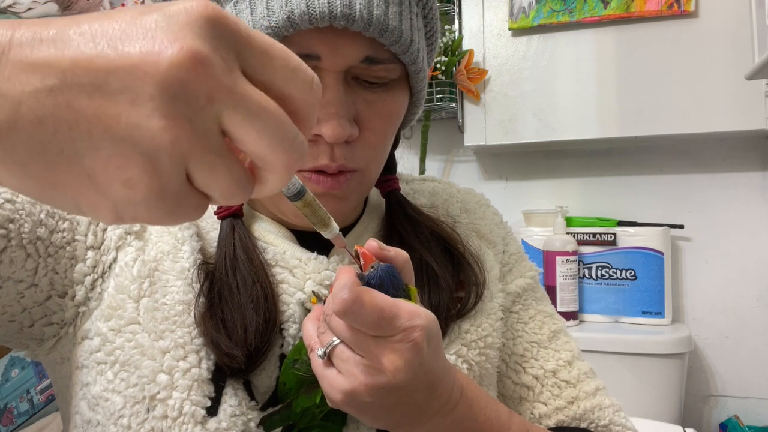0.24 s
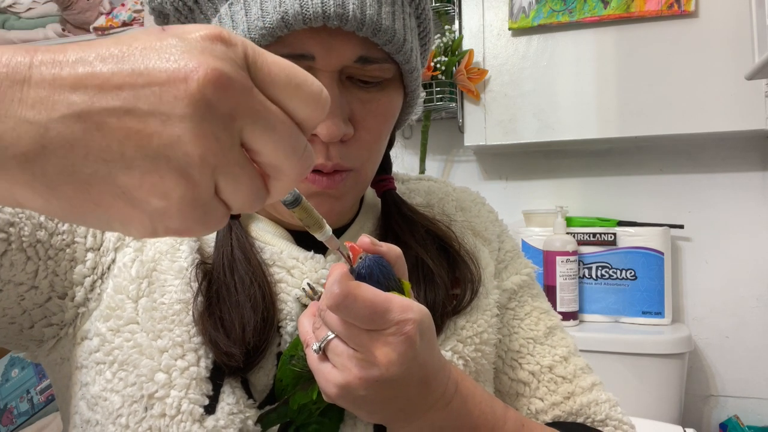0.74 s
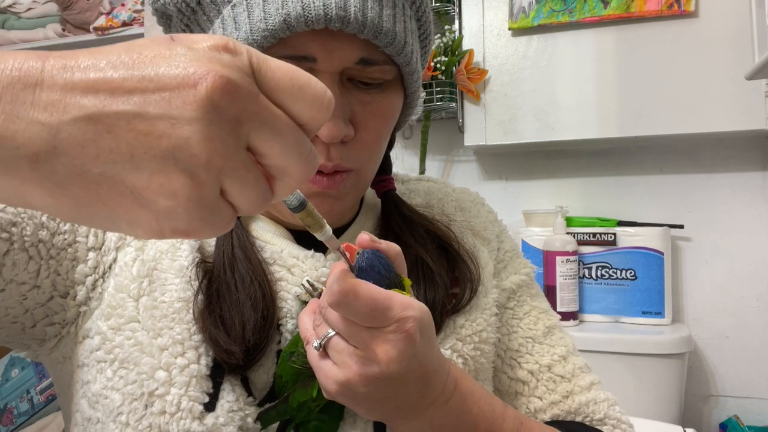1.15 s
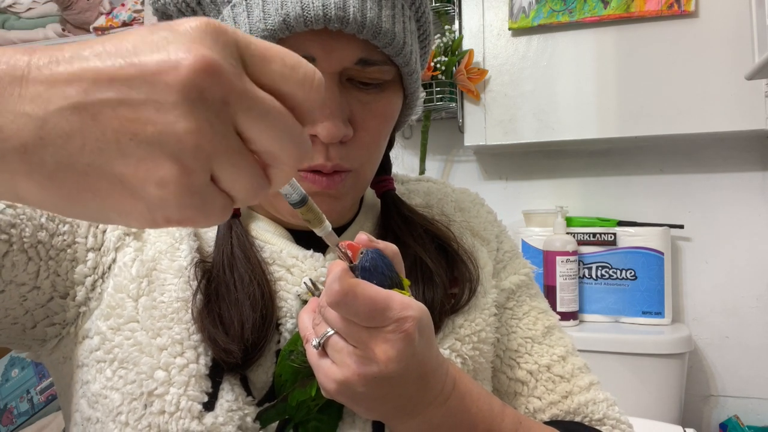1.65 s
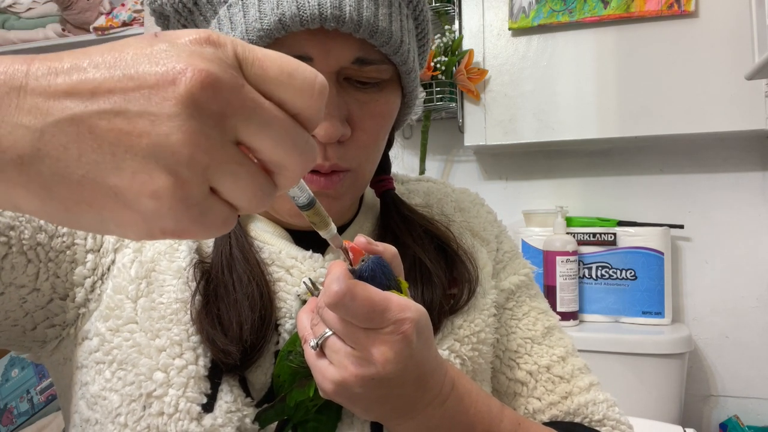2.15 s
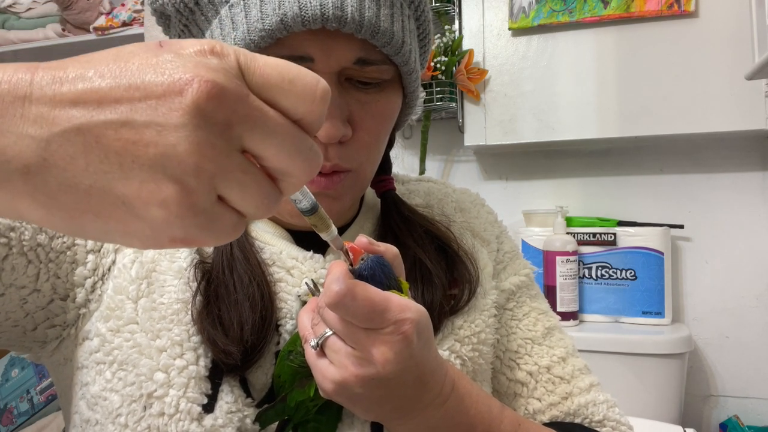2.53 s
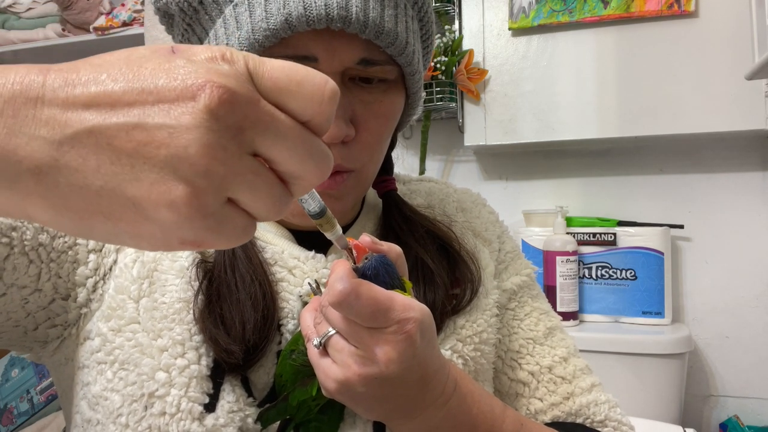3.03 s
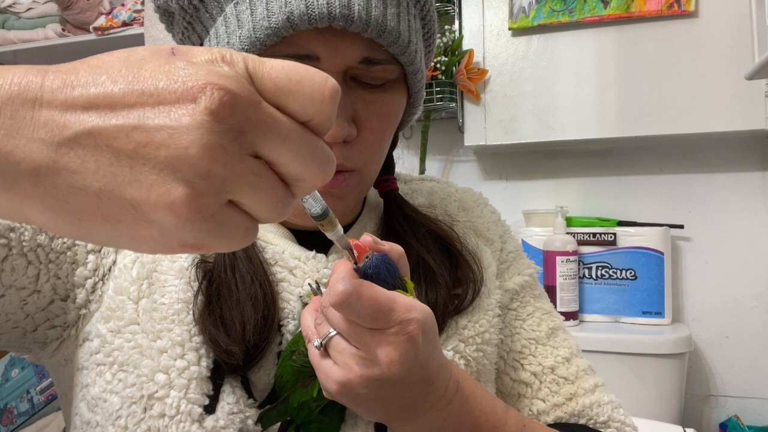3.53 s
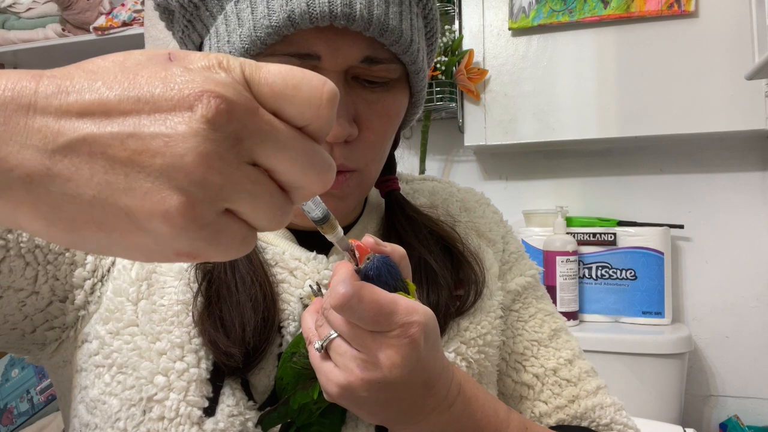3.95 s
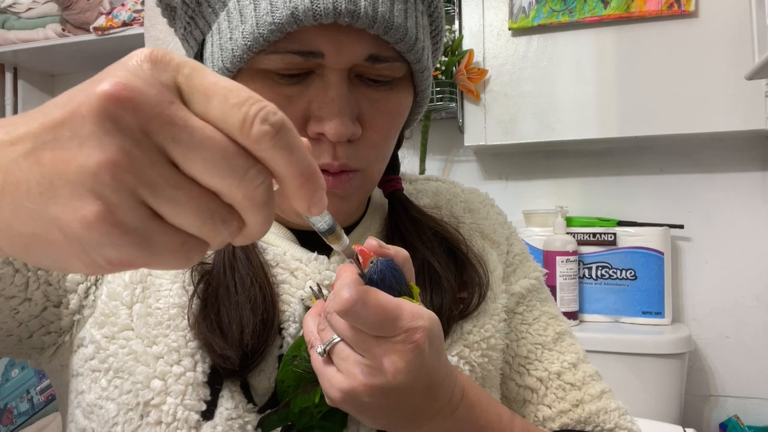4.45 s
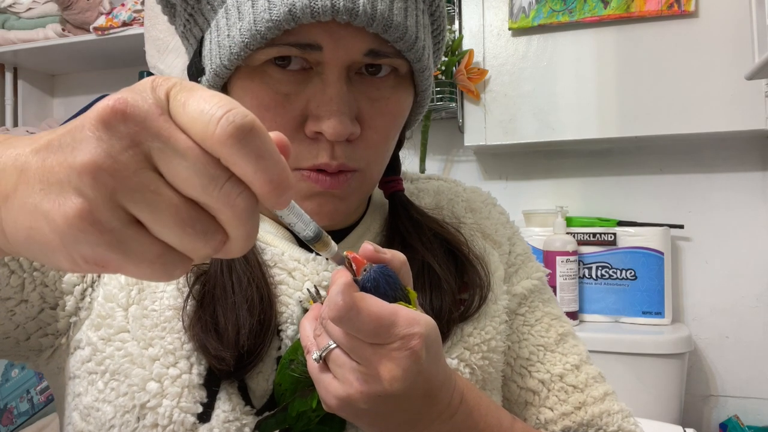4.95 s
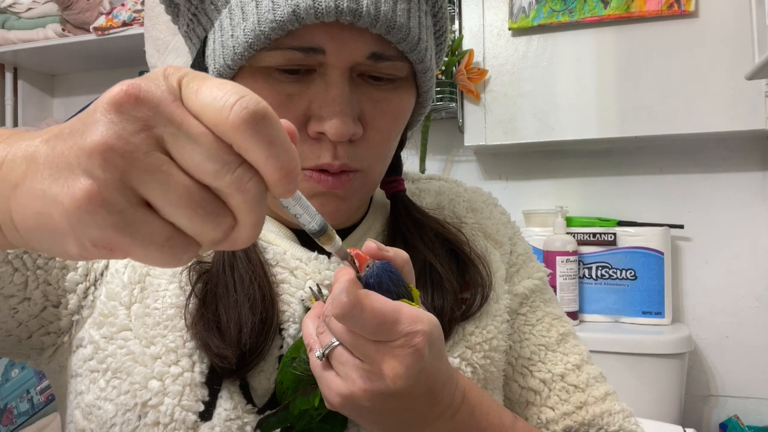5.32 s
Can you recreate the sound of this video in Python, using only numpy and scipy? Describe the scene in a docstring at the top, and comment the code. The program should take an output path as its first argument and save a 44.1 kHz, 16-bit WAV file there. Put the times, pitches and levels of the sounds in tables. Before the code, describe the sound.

A small parrot screeches harshly and repeatedly, about twice a second, very close by in a small room with hard walls.

```python
"""A hand-held lorikeet is already screeching as the sound begins, close by in a small bathroom.
Membranes in its voice box slap together about 950 times a second; a fast flutter chops these pulses,
and throat, mouth and beak colour them. Squeaks edge each screech, and the hard walls ring briefly.
Between the twelve screeches come four thin, falling wheezes and, later on, a few beak clicks.
Behind it all lies a faint room noise, with a low rumble that swells near 1.8 s and again near 4.4 s."""
import sys
import numpy as np
from scipy import signal
from scipy.fft import rfft, irfft, next_fast_len
from scipy.io import wavfile
from scipy.ndimage import uniform_filter1d, map_coordinates

SR = 44100
rng = np.random.default_rng(int(sys.argv[2]) if len(sys.argv) > 2 else 0)


def unload_wav(signal):
    """Save mono or channel-first audio to the path in sys.argv[1] as 16-bit WAV at rate SR, clipped to [-1, 1]."""
    wavfile.write(
        sys.argv[1],
        SR,
        np.round(np.clip(np.atleast_2d(signal).T, -1, 1) * 32767).astype(np.int16),
    )


N = 246078

# One row per screech; levels are relative. Columns: start_s, end_s, level_db, attack_s, sag_db_per_s,
# pitch_hz, jitter (uneven pulse timing, 0-1), windpipe_db, mouth_db, beak_db, closing_squeak_db
SCREECHES = [ (-.06, 0.257, -19.5, .005, 0.5, 916, 0.11, -4, -5.5, 0.5, -30.5),
             (0.443, 0.766, -27, .007, -6, 850.2, .17, -13, -25, -3.5, -38),
             (0.966, 1.276, -26, .015, 16, 966.6, .095, -8, -19.5, -4, -37.5),
             (1.448, 1.794, -21.5, 0.02, 3, 1010, .045, -3, -4.5, -5.5, -35.5),
             (1.992, 2.23, -21, 0.022, 9.5, 944, .08, -6.5, -5, 0.5, -34.5),
             (2.493, 2.691, -21, .019, 6, 918, .08, -6.5, -4.5, 0, -36.5),
             (2.876, 3.175, -23, 0.013, -7.5, 913.5, .08, -8, -2.5, 3, -35),
             (3.377, 3.65, -23.5, 0.02, -10, 915, .07, -10.5, -6, 1.5, -30),
             (3.845, 4.118, -22, 0.013, 12, 894.4, .095, -10, -7, 1.5, -35),
             (4.376, 4.525, -26, 0.022, -2, 925, .08, -10, -7, -1, -39.5),
             (4.679, 5.017, -21, 0.013, 5, 954.7, .08, -5.5, 4, 2.5, -31),
             (5.213, 5.51, -22, .011, 5, 949, 0.07, -6.5, 2.5, 2, -34), ]


def screeches():
    """The bird's loud calls, each placed at its own time."""
    out = np.zeros(N)
    for row in SCREECHES:
        start, end = row[:2]
        i = np.arange(max(0, int(start * SR)), min(N, int(end * SR)))
        out[i] += screech(i / SR, row)
    return out


def screech(t, row, tone_db=-21, tone_waver=.38):
    """One call: the pitch rises and falls while fluttering pulses ring windpipe, mouth and beak."""
    start, end, level_db, attack_s, sag_db_per_s, pitch_hz, jitter, pipe_db, mouth_db, beak_db, _ = row
    pressure_db, edge_db = effort(t, start, end, attack_s, sag_db_per_s)
    ends = np.linspace(-1, 1, len(t)) ** 4  # 1 at both ends, 0 in the middle
    pitch = pitch_hz * (1.008 - .08 * ends + .012 * wobble(35, len(t)))
    clarity = np.clip(0.062 / jitter, .3, 1.6)  # a ragged screech loses its tone and hisses more
    pulses = voice_box(pitch, jitter, air=0.58 / clarity) * flutter(t - start)
    rasp = throat_and_beak(pulses, mouth_db, beak_db)
    pipe = windpipe(pulses, pitch_hz)
    # the harder the bird presses, the more of the sound comes from the windpipe
    ring_db = pipe_db + 0.74 * pressure_db + .3 * edge_db
    pipe_share = np.clip(amp(ring_db) ** 2 - .04, 0, .8)
    # the smooth swing of the membranes adds a plain tone that the flutter does not chop
    swing_hz = pitch * (1 + tone_waver * jitter / clarity * wobble(500, len(t)))
    swing = np.sin(phase_of(swing_hz)) * amp(1.5 * wobble(150, len(t)))
    tone = amp(tone_db) * clarity * (1 - ends) * unit(swing)
    voice = np.sqrt(1 - pipe_share) * rasp + np.sqrt(pipe_share) * pipe + tone
    fade = np.clip((t[-1] - t) / .016, 0, 1)
    return fade * amp(level_db + pressure_db + edge_db) * voice


def effort(t, start, end, attack_s, sag_db_per_s, surge_width_s=0.059, release_s=0.017):
    """A screech's strength in dB, in two parts: the air pressure, and the fade in and out."""
    # The bird presses harder for a moment, or falters if negative. Columns: time_s, change_db
    surges = [(.078, -7), (1.055, 3), (2.934, 3.5), (3.53, 2), (4.479, 6.5), (4.89, 0.5), (5.295, 2)]
    surge_db = sum(db * np.exp(-((t - s) / surge_width_s) ** 2) for s, db in surges)
    pressure_db = surge_db - sag_db_per_s * (t - (start + end) / 2)
    attack_db = -29.5 * np.exp(-np.abs((t - start) / attack_s) ** 1.48)
    release_db = -19.5 * np.exp((t - end) / release_s)
    return pressure_db, attack_db + release_db


def voice_box(pitch, jitter, air, air_hz=3000):
    """Membranes slap together at uneven intervals; each slap gives a sharp pulse and a puff of hiss."""
    n = len(pitch)
    cycles = np.cumsum(pitch) / SR
    slaps = np.cumsum(np.abs(1 + jitter * rng.standard_normal(512)))  # counted in cycles
    sizes = amp(1.2 * rng.standard_normal(len(slaps)))
    heard = slaps < cycles[-1]
    # a slap falls between samples, so its pulse is spread over the 16 nearest
    position = np.interp(slaps[heard], cycles, np.arange(n))
    nearby = position.astype(int)[:, None] + np.arange(-7, 9)
    offset = nearby - position[:, None]
    shapes = np.sinc(offset) * np.cos(np.pi * offset / 16) ** 2 * sizes[heard, None]
    pulses = np.bincount(np.clip(nearby, 0, n - 1).ravel(), shapes.ravel(), n)
    # a puff of air comes with each slap and dies away before the next
    opening = 1 + np.cos(2 * np.pi * np.interp(cycles, slaps, np.arange(len(slaps))))
    puffs = filtered(opening * rng.standard_normal(n), lambda hz: hz / np.hypot(hz, air_hz))
    return unit(pulses - pulses.mean()) + air * unit(puffs)


def flutter(t, rate_hz=127, unsteady=.2):
    """A slower shaking chops the voice: separate pops at first, then a rattle with a beat in between."""
    phase = phase_of(rate_hz * (1 + unsteady * wobble(119.05, len(t))))
    depth = 3 + 10 * np.exp(-t / .03)
    gate = amp(depth * np.cos(phase) + 1.5 * np.cos(2 * phase) + 1.5 * wobble(330, len(t)))
    average_level = np.sqrt(np.abs(uniform_filter1d(gate ** 2, size=SR // 40)))
    return unit(np.tanh(gate / average_level / 2))  # the passage opens only so far


def throat_and_beak(pulses, mouth_db, beak_db):
    """Throat, mouth and beak each favour some frequencies; an open beak also lets out a high sizzle."""
    # The throat's broad colour. Columns: frequency_hz, gain_db
    throat = [(130, -21.5), (240, -15), (370, -18), (520, -10), (720, -7), (950, -11), (1350, -10.5),
              (1750, -12), (2200, -6.5), (2400, -7), (2800, -4), (3300, -7), (4100, -13.5), (4550, -9),
              (5100, -7.5), (6200, -13.5), (7500, -6.5), (13000, -34.5)]
    # The sizzle from the sharp edge of each pulse. Columns: frequency_hz, gain_db
    sizzle = [(5500, -37.5), (7400, -17.5), (8100, -6.5), (8750, -5.5), (9200, -6.5), (10600, -7),
              (12000, -23), (13000, -10), (14200, -26.5), (15500, -20)]

    def gain(hz):
        parts = [amp(along(throat, hz)),
                 amp(along(sizzle, hz) - 0.5 + 0.82 * beak_db),
                 amp(mouth_db) * resonance(hz, centre_hz=5514, width_hz=970),
                 amp(beak_db + 0.5) * resonance(hz, centre_hz=6970, width_hz=690)]
        return np.linalg.norm(parts, axis=0)

    return unit(ring(pulses, gain))


def windpipe(pulses, pitch_hz, usual_pitch_hz=916):
    """The windpipe rings in one band, which lies a little higher for a higher screech."""
    centre_hz = 3773 * (pitch_hz / usual_pitch_hz) ** 0.28
    return unit(ring(pulses, lambda hz: resonance(hz, centre_hz, width_hz=670) * hz / (hz + 1500)))


def squeaks(centre_hz=2280, rise_hz=352, fall_hz=850, length_s=0.048, waver=0.025, shake_db=4):
    """Short, shaky whistles slide up as the membranes catch and down as they let go."""
    out, n = np.zeros(N), int(length_s * SR)
    for start, end, _, attack_s, *_, closing_db in SCREECHES:
        opening = start + .019, rise_hz, amp(-37) * (attack_s / 0.025) ** 2  # louder on a slow start
        closing = end - 0.021, -fall_hz, amp(closing_db)
        for time_s, glide_hz, gain in (opening, closing):
            pitch = (centre_hz + glide_hz * np.linspace(-.5, .5, n)) * (1 + waver * wobble(830, n))
            tone = unit(np.sin(phase_of(pitch)) * amp(shake_db * wobble(400, n)))
            if time_s > length_s:
                out[int(time_s * SR) - n // 2:][:n] += gain * np.hanning(n) * tone
    return out


def wheezes(octave_db=-10, waver=.018):
    """A thin, falling whistle with its octave as the bird breathes in."""
    # Breaths between screeches. Columns: start_s, end_s, first_pitch_hz, last_pitch_hz, level_db
    breaths = [(0.776, 0.981, 1923, 1625, -63.5), (1.832, 2, 1805, 1733, -64),
               (2.755, 2.898, 1904, 1550, -66.5), (4.17, 4.373, 1807, 1630, -66.5)]
    out = np.zeros(N)
    for start, end, first_hz, last_hz, level_db in breaths:
        n = int((end - start) * SR)
        phase = phase_of(np.linspace(first_hz, last_hz, n) * (1 + waver * wobble(330, n)))
        tone = unit(np.sin(phase) + amp(octave_db) * np.sin(2 * phase))
        loudness = amp(level_db + 1.5 * wobble(70, n)) * signal.windows.tukey(n, .5)
        out[int(start * SR):][:n] += loudness * tone
    return out


def beak_clicks(decay_s=0.025):
    """Small snaps of beak and tongue: bursts of noise that fall 60 dB in decay_s."""
    # The snaps. Columns: start_s, level_db
    clicks = [(2.408, -51), (3.344, -56.5), (4.37, -34.5), (4.381, -32)]
    # The colour of a snap. Columns: frequency_hz, gain_db
    colour = [(150, -29.5), (500, -4), (1200, -5.5), (2200, -7), (4500, -7), (7000, 3), (14000, -16)]
    out, t = np.zeros(N), np.arange(SR // 20) / SR
    for start, level_db in clicks:
        snap = unit(ring(rng.standard_normal(len(t)), lambda hz: amp(along(colour, hz))))
        out[int(start * SR):][:len(t)] += amp(level_db - 60 * t / decay_s) * snap
    return out


def bathroom(x, echo_db=-3.0, build_s=0.00067, early_boost=4.76, early_s=0.027):
    """The direct sound, then echoes from near, hard walls; the high frequencies die first."""
    # How long the walls ring. Columns: frequency_hz, decay_s (time to fall 60 dB)
    walls = [(200, 0.76), (1000, 0.27), (3500, 0.27), (7000, 0.22), (14000, 0.11)]
    # How unlike the left and right echoes are. Columns: frequency_hz, spread (0-1)
    spread = [(200, 0.28), (1000, 1), (5800, 0.91), (7400, 0.2), (9300, 0.87), (10800, 0.022),
              (12200, 0.11), (13000, 1), (14000, .1)]
    hz, t, noise = signal.stft(rng.standard_normal((2, SR // 2)), SR, nperseg=256)
    decay = amp(-60 * t / along(walls, hz)[:, None])
    angle = np.arcsin(np.clip(along(spread, hz), 0, 1) / np.sqrt(2))
    shares = np.array([np.cos(angle), np.sin(angle)])[..., None]
    middle, side = signal.istft(noise * decay * shares, SR, nperseg=256)[1]
    age = np.arange(len(middle)) / SR
    paths = np.array([middle + side, middle - side]) * (1 - np.exp(-age / build_s))
    paths *= 1 + early_boost * np.exp(-age / early_s)  # hands and cabinet reflect first and strongest
    paths = amp(echo_db) * paths / np.linalg.norm(paths[0])
    paths[:, 0] = 1  # the direct sound
    # even out the broad colour, keeping the walls' fine peaks and dips
    colours = np.sqrt(np.abs(uniform_filter1d(np.abs(rfft(paths)) ** 2, size=200)))
    grid_hz = np.fft.rfftfreq(len(age), 1 / SR)
    channels = []
    for path, colour in zip(paths, colours):
        echoed = signal.fftconvolve(x, path)[:N]
        channels.append(ring(echoed, lambda f: 1 / np.interp(f, grid_hz, colour)))
    return np.array(channels)


def background(room_noise_db=-81, rumble_rest_db=-85, rise_s=.03, decay_s=0.14):
    """Faint, steady room noise and a soft low rumble that swells twice."""
    # Swells of the rumble. Columns: peak_s, level_db
    peaks = [(1.81, -58.5), (4.42, -64.5)]
    # The rumble's colour. Columns: frequency_hz, gain_db
    rumble_colour = [(20, -13.5), (45, -10.5), (62, -1), (80, -1), (140, -35), (400, -65.5)]
    # The quiet room's colour. Columns: frequency_hz, gain_db
    room_colour = [(20, -9), (60, 7.5), (250, -0.5), (500, -10), (1000, -11.5), (3000, -19.5), (9000, -17),
                   (16000, -42)]

    def noise(colour):
        stereo = rng.standard_normal(N) + .5 * rng.standard_normal((2, N))
        return unit(filtered(stereo, lambda hz: amp(along(colour, hz))))

    t = np.arange(N) / SR
    swells = sum(amp(db) * np.exp(-np.maximum((s - t) / rise_s, (t - s) / decay_s)) for s, db in peaks)
    rumble = (amp(rumble_rest_db) + swells) * noise(rumble_colour)
    return rumble + amp(room_noise_db) * noise(room_colour)


def amp(db):
    """Turn decibels into a multiplier."""
    return 10 ** (np.asarray(db) / 20)


def unit(x):
    """Scale x to an average (rms) level of 1."""
    return x / np.sqrt(np.mean(x ** 2) + 1e-20)


def along(points, hz):
    """Read between (frequency_hz, value) points, with octaves evenly spaced."""
    frequencies, values = np.transpose(points)
    return np.interp(np.log(hz + 1), np.log(frequencies), values)


def phase_of(pitch_hz):
    """The running angle of a wave whose pitch changes."""
    return 2 * np.pi * np.cumsum(pitch_hz) / SR


def wobble(rate, size):
    """A smooth curve through `rate` random values a second."""
    return map_coordinates(rng.standard_normal(4096), [np.arange(size) * rate / SR], mode="wrap")


def resonance(hz, centre_hz, width_hz):
    """The gain of a ringing band with a flat top and steep sides."""
    return 1 / np.sqrt(1 + (2 * (hz - centre_hz) / width_hz) ** 4)


def filtered(x, response):
    """Multiply each frequency in x by response(hz)."""
    n = x.shape[-1]
    padded = next_fast_len(n + SR // 8)
    return irfft(rfft(x, padded) * response(np.fft.rfftfreq(padded, 1 / SR)), padded)[..., :n]


def ring(x, gain, size=2048):
    """Colour x by gain(hz), so that the ringing follows each sound and never comes before it."""
    cepstrum = irfft(np.log(gain(np.fft.rfftfreq(size, 1 / SR)) + 1e-6))
    # fold the part before time zero onto the part after it
    cepstrum[1:size // 2] *= 2
    cepstrum[size // 2 + 1:] = 0
    return signal.fftconvolve(x, irfft(np.exp(rfft(cepstrum))))[:len(x)]


def scene(voice_db=3, squeak_db=1):
    """The bird, the walls and the quiet behind them."""
    bird = amp(voice_db) * screeches() + amp(squeak_db) * squeaks() + wheezes() + beak_clicks()
    return bathroom(bird) + background()


def record(dry, top_hz=15850):
    """A stereo microphone: its sides differ in level and timing, and it cuts off around top_hz."""
    # Level between the sides. Columns: frequency_hz, left_minus_right_db
    balance = [(100, -2), (650, -5), (930, -7), (1250, -2), (1700, 5), (2200, -1), (2800, -3), (3550, -5.5),
               (4200, 0), (5300, -6), (6100, -7), (6800, -1), (8000, 0)]
    # How far the right side's wave runs ahead. Columns: frequency_hz, lead_radians
    right_lead = [(300, .2), (1500, .3), (2100, 0), (2500, 1.8), (3800, 1.8), (5400, 3), (6300, 5.6),
                  (7400, 6.25), (8200, 6.2), (10400, 3.2), (12200, 3.1), (13700, 0)]
    sides = np.array([[.5], [-.5]])

    def pickup(hz):
        level = amp(sides * along(balance, hz))
        timing = np.exp(-1j * sides * along(right_lead, hz))
        cutoff = np.clip((top_hz - hz) / 200 + .5, 0, 1)
        return level * timing * cutoff

    return filtered(dry, pickup)


dry = scene()
out = record(dry)
unload_wav(out)
```